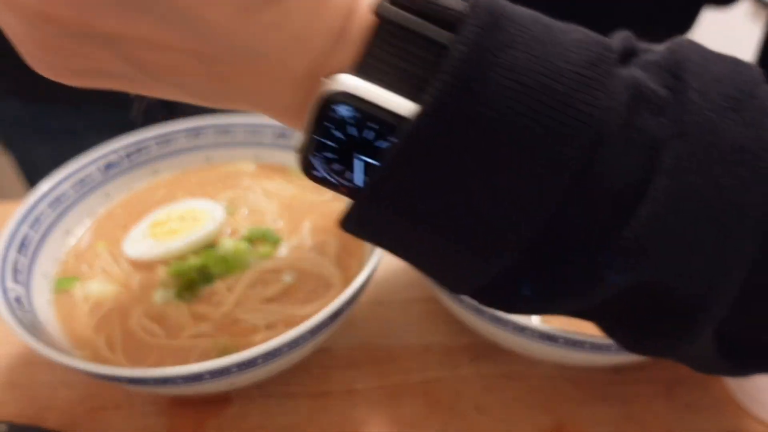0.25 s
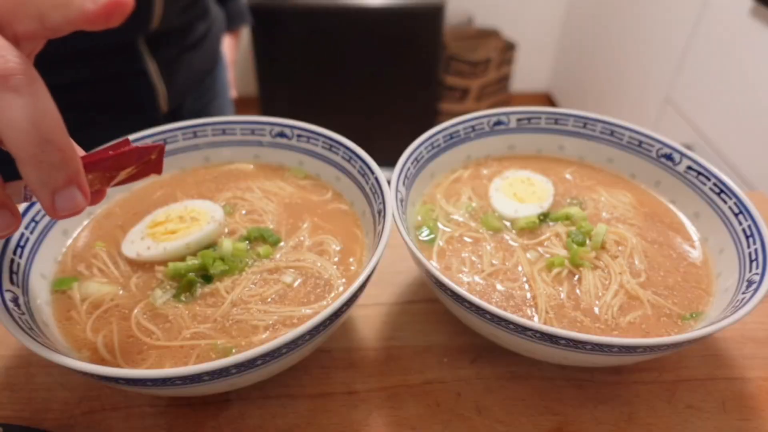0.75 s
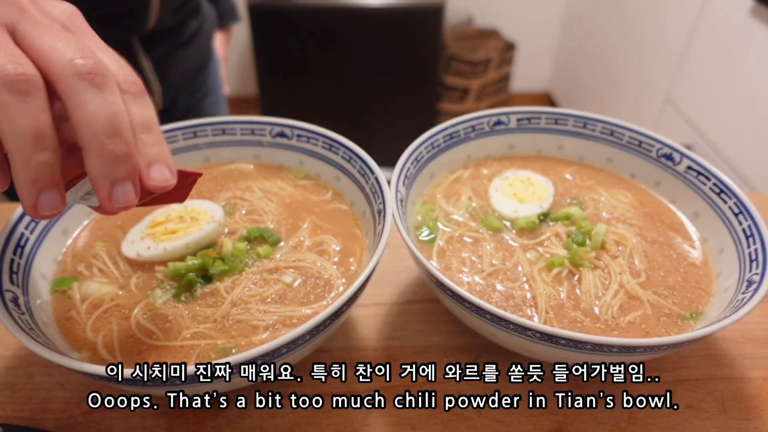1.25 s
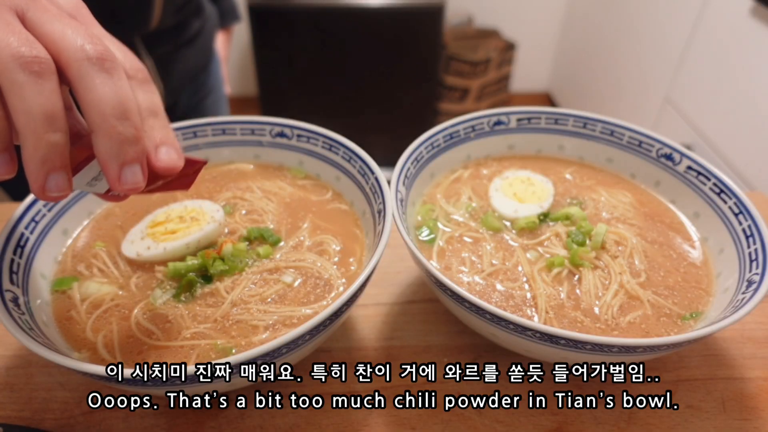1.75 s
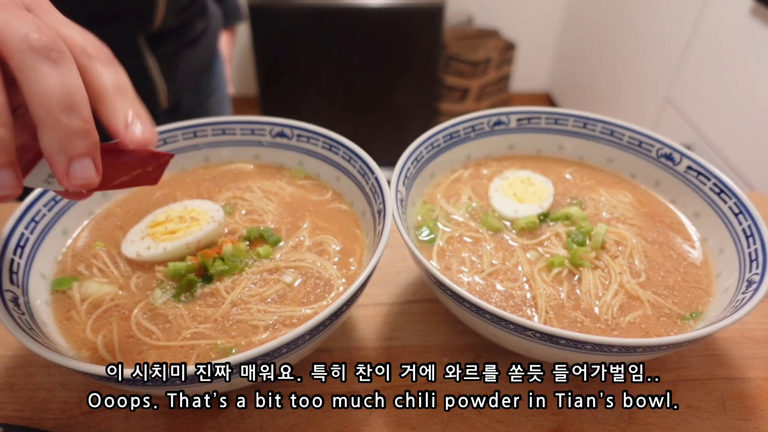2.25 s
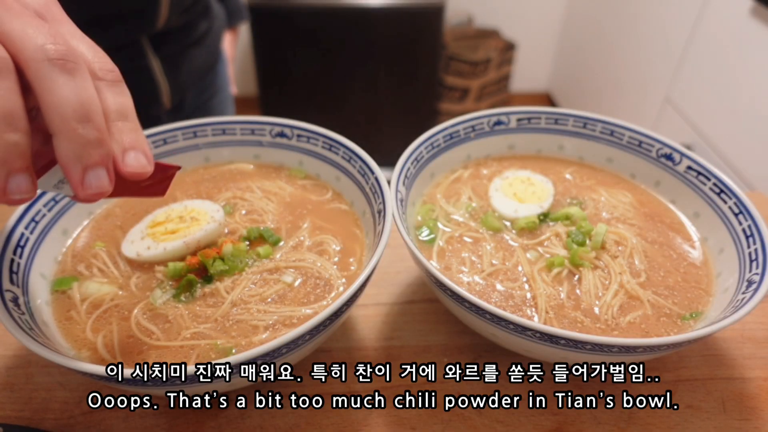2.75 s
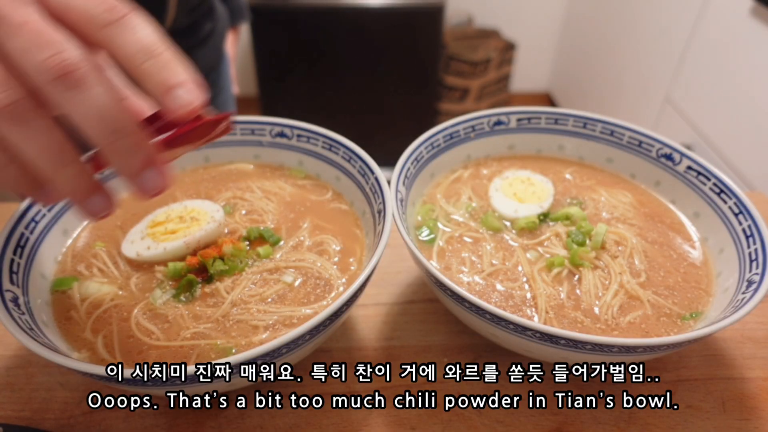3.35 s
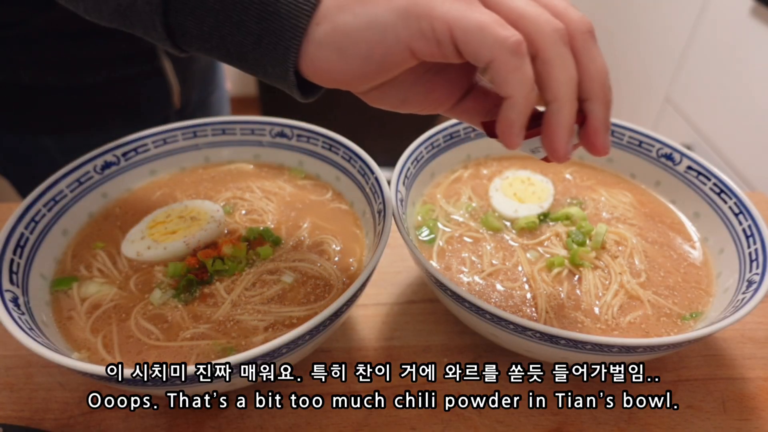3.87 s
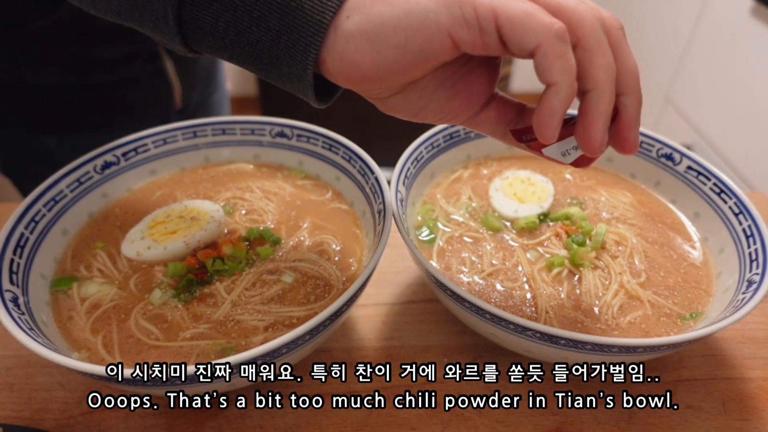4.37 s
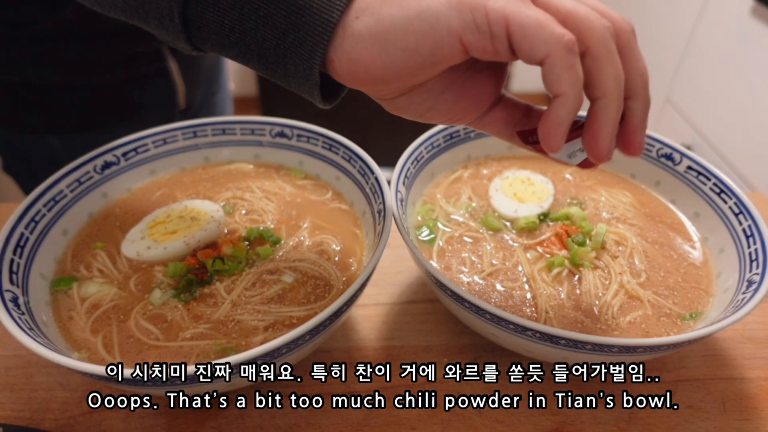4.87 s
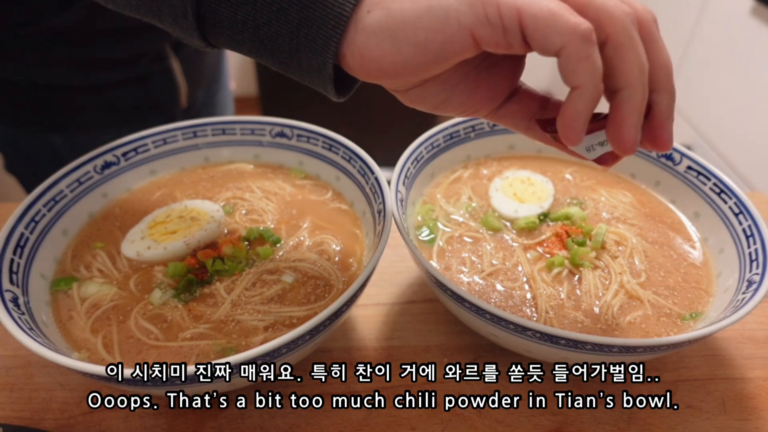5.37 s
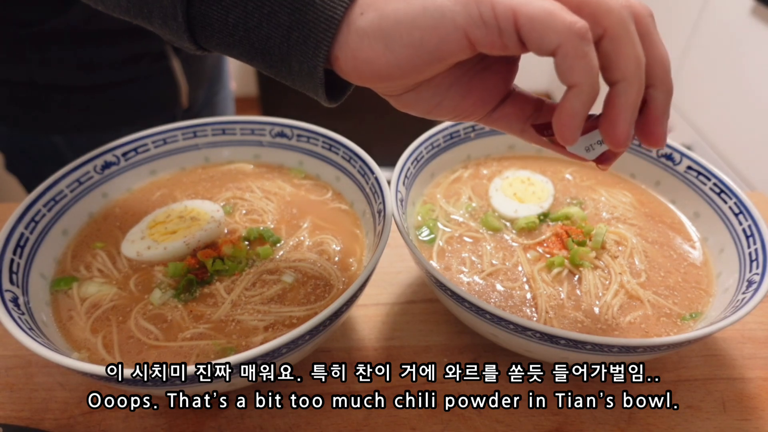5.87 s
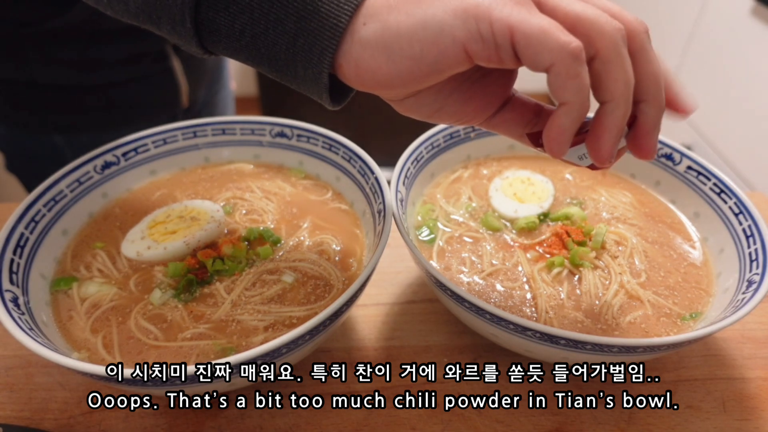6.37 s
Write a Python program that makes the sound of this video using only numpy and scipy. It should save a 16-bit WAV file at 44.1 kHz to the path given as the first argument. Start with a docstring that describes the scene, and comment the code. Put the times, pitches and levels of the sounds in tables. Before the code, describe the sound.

A small foil sachet is crumpled close to the microphone in a small kitchen, a dense, crisp crackle that stops dead at about 0.6 seconds. A bright crack with a short rustling tail follows at 0.9. Between 1.3 and 2.8 seconds a finger flicks the sachet five times, each flick a quick, sharp double snap, with tiny ticks between. Farther off, things slide and knock softly from about 2 seconds, with a sharper knock at 3.7. The sachet gives one loud snap at 3.85, then weaker, papery flicks from 4.4 to 5.4. From about 5.2 seconds the distant knocking and sliding build into a clatter with a short room ring, loudest in a scrape and knock around 6.1 and a heavier bump at 6.3. A last small crinkle comes at 6.5. A faint steady hiss runs throughout.

```python
"""A small kitchen, one microphone, a faint steady hiss. Close up, a foil sachet is crumpled, its creases giving
way in tiny avalanches, until the crackling breaks off abruptly. It is then squeezed and flicked over two bowls
of soup, each flick a touch, a press and a release: strong snaps ring the taut pouch, weak ones are slack,
papery. Meanwhile, farther off, things are slid about and knocked, loudest near the end."""
import sys
import numpy as np
from scipy import signal
from scipy.fft import rfft, irfft
from scipy.io import wavfile

SR = 44100
rng = np.random.default_rng(int(sys.argv[2]) if len(sys.argv) > 2 else 0)


def log_audio(samples):
    """Write samples as a 16-bit WAV file to the path given in sys.argv[1]."""
    # one column per channel
    frames = np.atleast_2d(samples).T
    # limit to full scale, then quantise
    limited = np.clip(frames, -1, 1)
    pcm = np.round(limited * 32767).astype(np.int16)
    wavfile.write(sys.argv[1], SR, pcm)


N = 291942
TIME = np.arange(N) / SR


def from_db(db):
    """Decibels to gain."""
    return 10 ** (np.asarray(db) / 20)


def rms_one(x):
    """Scale to rms 1."""
    return x / np.sqrt(np.mean(x ** 2) + 1e-20)


def burst_one(x):
    """Scale a short burst to the energy of 4 ms at rms 1."""
    return x / np.sqrt(np.sum(x ** 2) / (.004 * SR) + 1e-20)


def add(out, s, sound):
    """Mix a sound in at time s."""
    start = int(np.clip(round(s * SR), 0, N - 1))
    out[start:start + len(sound)] += sound[:N - start]


def band(x, low_hz, high_hz, order=2):
    """Butterworth band-pass."""
    return signal.sosfilt(signal.butter(order, [low_hz, high_hz], "band", fs=SR, output="sos"), x)


def colour(x, spectrum, size=4096):
    """Causal (minimum-phase) filter that follows rows of f/Hz, level/dB."""
    hz, db = np.transpose(spectrum)
    bins_hz = np.arange(size // 2 + 1) * SR / size
    gain = from_db(np.interp(np.log(bins_hz + 1), np.log(hz), db))
    cepstrum = irfft(np.log(gain))
    cepstrum[1:size // 2] *= 2
    cepstrum[size // 2 + 1:] = 0
    return signal.fftconvolve(x, irfft(np.exp(rfft(cepstrum))))[:len(x)]


def resonate(x, modes, stretch):
    """Parallel resonances of alternating sign, all detuned by one factor."""
    out = 0
    for k, (hz, width_hz, db) in enumerate(modes):
        r = np.exp(-np.pi * width_hz / SR)
        poles = [1, -2 * r * np.cos(2 * np.pi * hz * stretch / SR), r * r]
        out = out + (-1) ** k * from_db(db) * signal.lfilter([1 - r * r, 0, r * r - 1], poles, x)
    return out


def grains(per_s, spread_db=3.5):
    """Random clicks, many small and few large; rms 1."""
    sizes = from_db(spread_db * np.minimum(rng.exponential(1, N), 4)) * rng.choice([-1, 1], N)
    return rms_one(sizes * (rng.random(N) < per_s / SR))


def kitchen(x, build_s, t60_s=.24):
    """The small room: diffuse reflections of unit energy that swell briefly and die away."""
    t = TIME[:SR // 2]
    swell = 1 - np.exp(-(t / build_s) ** 2)
    tail = rng.standard_normal(len(t)) * swell * from_db(-60 * t / t60_s)
    return signal.fftconvolve(x, tail / np.sqrt(np.sum(tail ** 2)))[:N]


def room_tone(level_db=-54.5):
    """A faint steady hiss lies under everything."""
    # colour of the hiss: f/Hz, level/dB
    spectrum = [(15, -53), (25, -0.5), (69, -3.5), (99, -6.5), (221, -2.5), (297, -7), (340, -2.5),
                (421, -1), (523, -4), (804, -2.5), (1110, -4.5), (1950, -5), (2420, -6), (15500, -26.5)]
    return from_db(level_db) * rms_one(colour(rng.standard_normal(N), spectrum))


def crumpling(stop_s=.625, crack_s=.0016, bump_s=.0096, creep_db=-37, run_db=-8.5, run_fade_s=.021):
    """Close up: big creases give way in avalanches; each grip bumps the foil and sets off small ones."""
    # the loudest creases: t/s, level/dB, treble over body/dB
    creases = [(.0131, -27.5, -4), (.0249, -25, -3), (.041, -26, -1), (0.0507, -20.5, 0), (0.0613, -30, -8),
               (0.0966, -25.5, -1), (.1, -24.5, 1), (.1245, -24, 13), (0.133, -27, -9), (0.1488, -28, 1),
               (.178, -28.5, -11), (.199, -23, -1.5), (.2681, -26, 2.5), (0.2886, -25, 5),
               (.3291, -21.5, -6), (0.3347, -22.5, 4), (0.347, -19, -4), (0.3761, -23.5, 1),
               (0.394, -26, 15), (.4138, -24, 14), (.4233, -21.5, 1.5), (0.4627, -21, 2), (0.4715, -24, -6),
               (.521, -17, 3), (0.532, -24, -10), (0.5603, -28, 0), (0.568, -22, 3), (0.5979, -24, 1),
               (0.6198, -33.5, 5)]
    # colour of crumpled foil: f/Hz, level/dB
    foil_spectrum = [(40, -11), (150, -12.5), (380, 0), (600, -5), (1000, -4.5), (1650, -5), (2050, 2.5),
                     (2600, -4.5), (4500, -7), (7500, -4), (10000, -18), (15500, -26)]
    # fingers closing on the foil: t/s, level/dB
    grips = [(.002, -27), (.05, -40), (.128, -29.5), (0.1468, -27), (.348, -29), (0.3762, -35),
             (0.434, -36), (0.4723, -45), (0.5362, -33), (.6, -33), (0.6192, -30)]
    # colour of their bump: f/Hz, level/dB
    bump_spectrum = [(40, -39), (120, -11), (350, 3), (750, -3), (1300, -6), (4000, -70)]
    t, cracks = TIME[:1024], np.zeros(N)
    for s, db, treble_db in creases:
        size = np.exp(.08 * rng.standard_normal())   # each crease's size shifts its colour
        spectrum = [(hz * size, level + treble_db * np.clip(np.log(hz / 3500), -.5, .5))
                    for hz, level in foil_spectrum]
        avalanche = rng.standard_normal(len(t)) * np.exp(-t / crack_s)
        add(cracks, s, from_db(db) * burst_one(colour(avalanche, spectrum, size=1024)))
    strain = np.full(N, from_db(creep_db))   # tiny creases keep going between the grips
    for s, db in grips:
        push = rng.standard_normal(len(t)) * np.exp(-t / bump_s)
        add(cracks, s, from_db(db) * burst_one(colour(push, bump_spectrum, size=1024)))
        add(strain, s, from_db(db + run_db) * np.exp(-TIME[:SR // 2] / run_fade_s))
    foil = cracks + strain * rms_one(colour(grains(per_s=3300), foil_spectrum))
    return (foil + from_db(-8) * kitchen(foil, build_s=.0029)) * (TIME < stop_s)


def buckles(touch_lead_s=.006, touch_db=-12):
    """Every snap of the sachet: lone creases, and the touch, press and release of each flick."""
    # lone creases giving way as the grip shifts: t/s, level/dB, extra treble/dB
    lone_snaps = [(.692, -48, 6.5), (.9141, -29.5, 7), (.9209, -34, 16), (.966, -35, 5.5),
                  (1.4727, -51, 6.5), (1.8928, -45.5, 4), (2.528, -39, 5.5), (2.9207, -43, 6),
                  (3.048, -47.5, 3), (3.0883, -49, 6), (3.823, -32, -10), (3.8396, -38, 1),
                  (3.8425, -37, 3), (3.8471, -26.5, 0), (3.8508, -16, -5.5), (3.878, -32.5, 5),
                  (3.9543, -39.5, 2.5), (4.5496, -36, 7.5), (4.608, -37, 12), (4.7483, -35.5, 3),
                  (4.8397, -36.5, -6), (4.9865, -41.5, 0.5), (5.046, -45.5, 2), (5.1288, -46, -4),
                  (5.2395, -35.5, -19), (5.3827, -42, -9), (5.8987, -32.5, 0), (6.205, -37, 13),
                  (6.266, -35, 0), (6.531, -39.5, 6), (6.5352, -29.5, 3), (6.5403, -36, 8)]
    # a finger snaps the sachet in and back out: press t/s, release t/s, press level/dB, release level/dB
    flicks = [(1.2877, 1.3358, -25.5, -23), (1.609, 1.6452, -26, -23.5), (1.7535, 1.8018, -25.5, -24),
              (2.3762, 2.4327, -26.5, -24), (2.7666, 2.7944, -27.5, -27.5), (4.399, 4.455, -36.5, -46),
              (4.5396, 4.6031, -32.5, -31.5), (4.7065, 4.7434, -30.5, -32.5), (5.401, 5.441, -35, -32.5)]
    rows = list(lone_snaps)
    for press_s, release_s, press_db, release_db in flicks:
        touch = (press_s - touch_lead_s, press_db + touch_db, 0)
        rows += [touch, (press_s, press_db, 0), (release_s, release_db, 0)]
    return rows


def snapping(taut_db=-23.5, stutter_s=.0022, bowl_echo_s=.00107, thud_db=-9.5, edge_db=-12, room_db=-9):
    """Close up: a crease buckles; its click rings the pouch, bounces off the bowl and fills the room."""
    # body resonances of the pouch, before tension scales them: f/Hz, width/Hz, level/dB
    body_modes = [(1520, 590, -10.5), (2180, 920, -2.5), (3340, 870, 3.5), (3950, 990, -5)]
    # its treble resonances: f/Hz, width/Hz, level/dB
    treble_modes = [(5300, 1380, 2), (7100, 390, 1), (6990, 780, 0.5), (8260, 1380, 0.5), (9900, 7800, -12)]
    t, out = TIME[:SR // 4], np.zeros(N)
    for s, body_db, extra_db in buckles():
        force_db = body_db - taut_db
        body_gain, treble_gain = from_db(body_db), from_db(-29.5 + .89 * force_db + extra_db)
        # strong snaps are one clean click, weak ones a papery stutter
        stutter = .089 * from_db(-.56 * force_db)
        click = (t == 0) + stutter * rng.standard_normal(len(t)) * np.exp(-t / stutter_s)
        size, distance = np.exp(.015 * rng.standard_normal(2))
        # a very big snap flips a larger, lower panel; a slack pouch sinks in pitch and hardly rings
        slack_db = max(-force_db, 0)
        stretch = np.exp(-.021 * max(force_db, 0) - .03 * slack_db) / size
        widen = .5 + .27 * slack_db
        panel = [(hz, width_hz * widen, db) for hz, width_hz, db in body_modes]
        lag = int(bowl_echo_s * SR * distance)
        echoed = click - .35 * np.pad(click, (lag, 0))[:len(t)] + 1e-18
        body = burst_one(band(resonate(echoed, panel, stretch), 1300, 5500, order=1))
        fingertip = from_db(thud_db) * (1 - 1 / widen) * burst_one(band(echoed, 560, 2600))
        treble = burst_one(band(resonate(echoed, treble_modes, 1 / size), 3500, 11500))
        bare_edge = from_db(edge_db) * burst_one(band(echoed, 4000, 16000))
        add(out, s, body_gain * (body + fingertip) + treble_gain * (treble + bare_edge))
        # the room hears the sheet from all sides, so the resonances blur into two broad bands
        spill = body_gain * burst_one(band(click, 1700, 4100))
        spill += treble_gain * burst_one(band(click, 4800, 7050))
        add(out, s, from_db(room_db) * kitchen(spill, build_s=.004))
    return out


def crack_tail_and_sliding(rise_share=.35, fidget_db=-59, split_hz=2500, room_db=-1):
    """Dense, roomy runs of clicks: the tail of one sachet crack, and the slips of far things sliding."""
    # first row, the bright, fading tail of the sachet's loud crack at 0.92 s; the rest, things being
    # shifted: t/s, length/s, level/dB, brightness/(dB per octave)
    runs = [(0.904, 0.09, -42.5, 3.5), (0.926, .3, -46, 0), (2.0, 0.18, -42.5, 0), (2.12, 0.32, -48.5, 0),
            (2.834, 0.15, -43.5, -3.5), (3.27, 0.15, -52.5, -4.5), (3.52, 0.1, -46.5, -0.5),
            (3.837, 0.28, -47.5, -1), (4.69, 0.63, -49, 0), (5.37, .12, -45.5, 0), (5.504, .15, -33, -1),
            (5.867, 0.12, -41, -3.5), (6.001, 0.14, -26.5, 0), (6.117, 0.21, -30, 0)]
    # colour of the runs: f/Hz, level/dB
    spectrum = [(30, -30), (90, -2.5), (200, -9.5), (500, -7.5), (850, -1), (1800, 2.5), (3000, 0),
                (4800, -0.5), (7000, -2.5), (10000, -11), (15500, -23)]
    rustle = rms_one(colour(grains(per_s=2800), spectrum))
    rustle = rms_one(rustle + from_db(room_db) * kitchen(rustle, build_s=.01))
    dull = signal.sosfilt(signal.butter(1, split_hz, fs=SR, output="sos"), rustle)
    dull_gain = bright_gain = from_db(fidget_db)   # fingers rub faintly between the runs
    for s, length_s, db, brightness in runs:
        swell = np.interp((TIME - s) / length_s, [0, rise_share, 1], [0, 1, 0])
        tilt_db = 2.3 * brightness   # each half counts as 2.3 octaves from the split
        dull_gain = np.maximum(dull_gain, swell * from_db(db - tilt_db))
        bright_gain = np.maximum(bright_gain, swell * from_db(db + tilt_db))
    return dull_gain * dull + bright_gain * (rustle - dull)


def knocking(crack_s=.0015, swell_s=.0018, boom_s=.02, air_db=-13.5, ring_t60_s=.23, ring_spread=1.055):
    """Across the room: a short crack, then the room's tail; the knocked thing rings at its own pitch."""
    # things knocked: t/s, level/dB, brightness/(dB per octave), thud level/dB, crack emphasis/dB,
    # ring f/Hz, ring over the blow/dB
    knocks = [(1.99, -57.5, 3.5, -73, 7, 863, 22), (2.862, -57, -5, -58, -3, 373, 14),
              (2.887, -46.5, -3.5, -80, 12.5, 1980, 11.5), (3.267, -40.5, -4, -74, 4, 800, -16),
              (3.356, -45, -1, -64, 4.5, 2420, 4), (3.374, -43.5, -4.5, -56.5, -3, 1850, 0),
              (3.397, -58.5, -5, -56, 14, 1100, -3), (3.6714, -31.5, -.5, -38.5, 8, 3910, 5),
              (3.6772, -31.5, 6, -39.5, 13, 3950, 2), (5.231, -38, -1.5, -72, -22, 3810, -10),
              (5.467, -46, -11, -31.5, -11, 238, -1), (5.52, -29.5, -1.5, -39, -7, 2375, 2),
              (5.585, -36, -1, -45, -4, 864, 3), (5.704, -44, 6, -48.5, -13, 5760, -2),
              (5.76, -32.5, -1.5, -40.5, -18, 799, 4.5), (5.805, -38.5, 3, -40.5, -14, 5840, 8.5),
              (5.819, -46, 1.5, -64, 20.5, 2900, 6), (5.947, -34, 1, -45, -11, 2900, -18),
              (6.019, -37, 8, -39, -24, 5850, 5.5), (6.108, -21, 2, -42.5, -8, 1380, 1.5),
              (6.146, -33.5, -4.5, -59, -5, 4530, 0), (6.282, -23.5, -0.5, -30, 1, 239, -2),
              (6.428, -43.5, -4.5, -45.5, -12, 814, -5)]
    # thud, low-mid, mid and treble bands of a knock: low f/Hz, high f/Hz, t60/s
    bands = [(129, 524, 0.34), (626, 1420, 0.29), (1500, 3940, 0.28), (4310, 7400, 0.32)]
    t, out = TIME[:SR // 2], np.zeros(N)

    def reflections(low_hz, high_hz):
        """Diffuse sound within one band, rms 1."""
        return rms_one(band(rng.standard_normal(SR), low_hz, high_hz, order=3)[-len(t):])

    octaves = np.log2([low_hz * high_hz for low_hz, high_hz, _ in bands]) / 2
    plain_db = np.array([-5.5, .5, -2])   # low-mid, mid and treble of a plain knock
    swell = 1 - np.exp(-t / swell_s)
    ring_fade = swell * from_db(-60 * t / ring_t60_s)
    for s, level_db, brightness, thud_db, crack_db, ring_hz, ring_db in knocks:
        tilt_db = brightness * (octaves[1:] - octaves[2])   # a harder contact is brighter
        levels = [thud_db, *(level_db + plain_db + tilt_db)]
        crack = from_db(crack_db + 6.5) * np.exp(-t / crack_s)
        envelopes = [from_db(db) * (crack + swell * from_db(-60 * t / t60))
                     for db, (_, _, t60) in zip(levels, bands)]
        blow = sum(envelope * reflections(low_hz, high_hz)
                   for envelope, (low_hz, high_hz, _) in zip(envelopes, bands))
        # a heavy knock also makes its support boom
        boom = band(swell * np.exp(-t / boom_s) * reflections(60, 230), 47, 600)
        boom *= from_db(thud_db + .62 * crack_db - 6)
        air = from_db(air_db) * envelopes[-1] * reflections(8000, 13000)
        # a cluster of close modes, smeared by the room, follows the strength of the blow at its pitch
        cluster = rms_one(ring_fade * reflections(ring_hz / ring_spread, ring_hz * ring_spread))
        blow_db = np.interp(np.log2(ring_hz), octaves, levels)
        ring = from_db(blow_db + ring_db) * cluster * np.sqrt(np.mean(ring_fade ** 2))
        add(out, s, blow + boom + air + ring)
    return out


def scene():
    """Near sachet and far kitchen reach one microphone, the same in both channels."""
    mono = room_tone() + crumpling() + knocking() + crack_tail_and_sliding() + snapping()
    return np.array([mono, mono])


def record(dry, cutoff_hz=15900):
    """The highest peaks are rounded and the top is cut."""
    low_pass = signal.ellip(10, .1, 70, cutoff_hz, fs=SR, output="sos")
    return signal.sosfilt(low_pass, np.tanh(dry))


dry = scene()
out = record(dry)
log_audio(out)
```